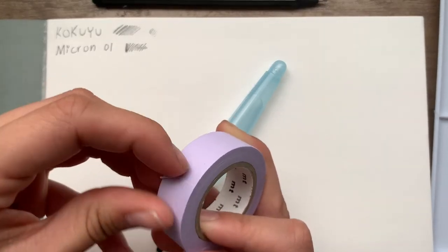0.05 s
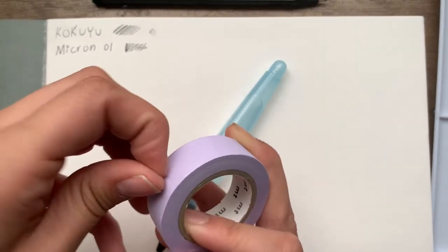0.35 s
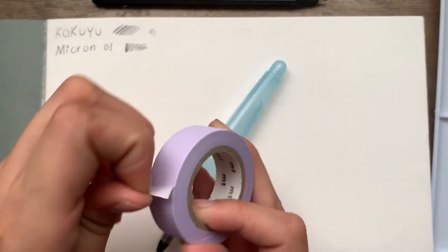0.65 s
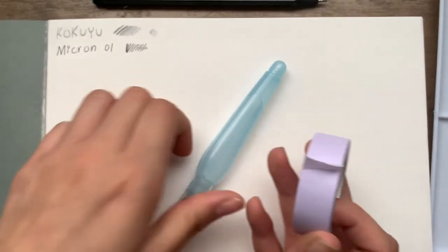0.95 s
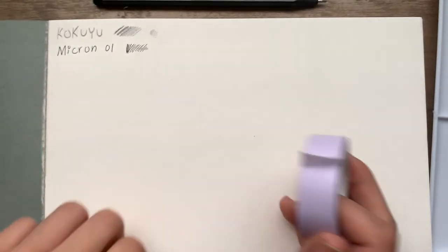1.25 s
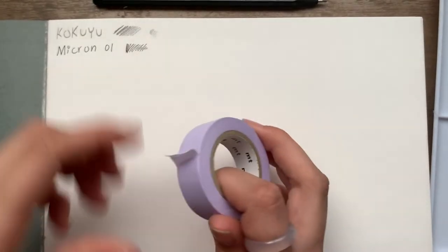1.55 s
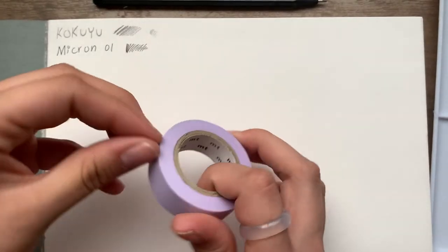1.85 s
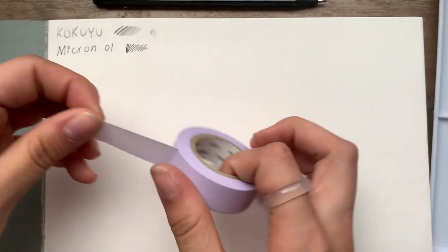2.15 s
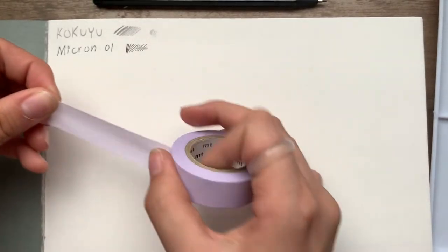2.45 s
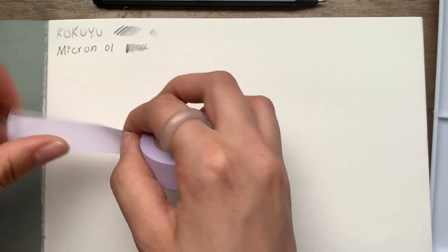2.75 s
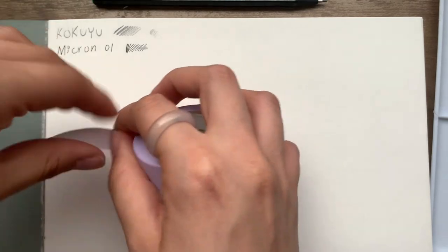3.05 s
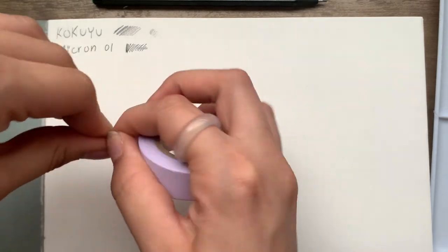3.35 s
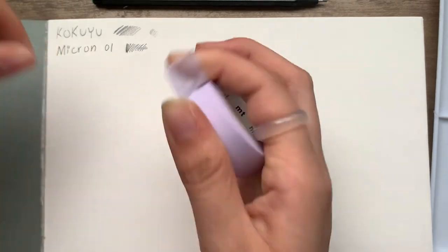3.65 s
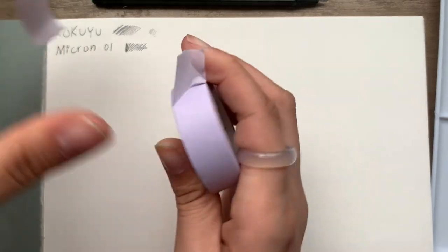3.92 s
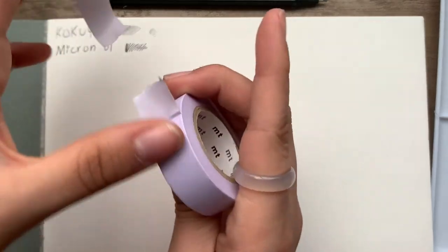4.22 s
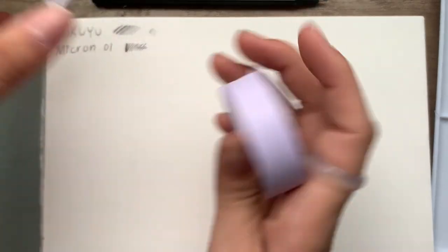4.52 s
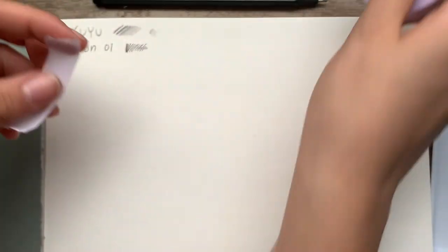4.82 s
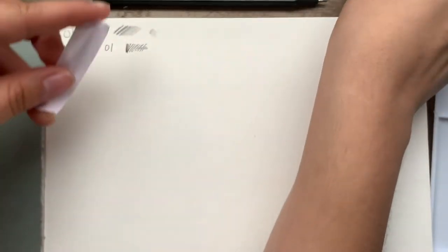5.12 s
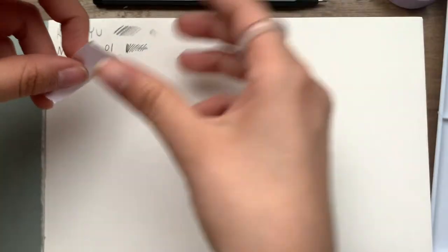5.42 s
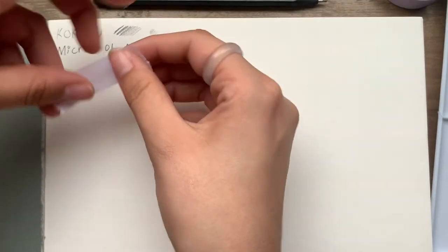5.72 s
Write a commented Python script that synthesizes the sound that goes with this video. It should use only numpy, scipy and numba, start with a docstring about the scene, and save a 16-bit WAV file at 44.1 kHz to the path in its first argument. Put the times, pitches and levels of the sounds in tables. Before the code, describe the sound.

Light nail clicks and a brief scrape lead into a plastic pen rattling down on a desk. Paper tape is then pulled from its roll with a soft, raspy hiss, crinkles slightly and is torn off with a crisp snap, with a second snap just after. The cardboard roll knocks hollowly onto the desk, and fingers faintly handle the strip. Everything is heard up close, indoors, over a faint low hum.

```python
"""Paper tape is peeled from its roll, close to a phone: glue threads rupture in a hiss and drive the taut
strip, which rasps and squeaks at a pitch that falls as it lengthens. Before the peel, a nail picks the end
loose and a plastic pen slides off paper, clatters onto the desk and rocks to rest. After it, the strip is
torn off and flicked free of a finger, and the roll is set down in hollow knocks. Impacts excite damped
modes, friction gives noise in tiny ruptures, and a small room hums quietly."""
import sys
import numpy as np
from scipy import signal
from scipy.fft import rfft, irfft, next_fast_len
from scipy.io import wavfile
from scipy.ndimage import uniform_filter1d, map_coordinates
from numba import njit

SR = 44100
rng = np.random.default_rng(int(sys.argv[2]) if len(sys.argv) > 2 else 0)


def store_wav(level_fs):
    """Save 16-bit WAV to argv[1]."""
    pcm = np.round(np.clip(np.atleast_2d(level_fs), -1, 1) * 32767)
    wavfile.write(sys.argv[1], SR, pcm.T.astype(np.int16))


N = 263762
TIME = np.arange(N) / SR
BRIEF = TIME[:SR // 2]  # time axis of one short event
TOP_HZ, PATCHY_DB = 16600, 3.5  # upper band edge; depth of the colour changes in rubbing and peeling


def amp(db):
    """Amplitude ratio of a level in decibels."""
    return 10 ** (np.asarray(db) / 20)

def unit(x):
    """Normalisation to rms 1."""
    return x / np.sqrt(np.mean(x ** 2) + 1e-20)

def crest(x):
    """Normalisation to peak 1."""
    return x / np.abs(x).max()

def along(points, hz):
    """Interpolation of (f/Hz, value) points on a logarithmic frequency axis."""
    f, v = np.transpose(points)
    return np.interp(np.log(hz + 1), np.log(f), v)

def add(track, s, sound):
    """Superposition of a short sound on a track at time s."""
    part = track[round(s * SR):][:len(sound)]
    part += sound[:len(part)]

def ease(middle, width):
    """Smooth step from 0 to 1 around a moment."""
    return .5 + .5 * np.tanh((TIME - middle) / (2 * width))

def drift(rate, size=N):
    """Random modulation: a smooth curve through rate knots a second."""
    knots = rng.standard_normal(4096)
    return map_coordinates(knots, [TIME[:size] * rate], order=2, mode="wrap")

def filtered(x, response):
    """Linear filtering: the spectrum of x times a frequency response."""
    n = x.shape[-1]
    m = next_fast_len(n + 8192)
    return irfft(rfft(x, m) * response(np.fft.rfftfreq(m, 1 / SR)), m)[..., :n]

def colour(x, spectrum, tilt_db=0):
    """Spectral shaping, tilted per octave and rolled off below the spectrum's first point."""
    low_cut = lambda hz: np.minimum(1, hz / spectrum[0][0]) ** 2
    octaves = lambda hz: np.log2(np.maximum(hz, 700) / 5000)
    return filtered(x, lambda hz: low_cut(hz) * amp(along(spectrum, hz) + tilt_db * octaves(hz)))

def soft(hz, top_hz):
    """Low-pass gain of a compliant contact, which excites little above top_hz."""
    return 1 / np.sqrt(1 + (hz / top_hz) ** 8)

def patchy(x, depth_db):
    """Random spectral modulation: the colour shifts from moment to moment."""
    spectra = signal.stft(x, nperseg=512)[2]
    field = uniform_filter1d(rng.standard_normal(spectra.shape), size=5, axis=0)
    field = uniform_filter1d(field, size=4, axis=1)
    return signal.istft(spectra * unit(amp(depth_db * unit(field))), nperseg=512)[1][:N]

def grains(rate, spread_db, size=N):
    """Shot noise: tiny random ruptures of uneven strength, rate a second."""
    happens = rng.random(size) < rate / SR
    impulses = happens * rng.standard_normal(size)
    return unit(impulses * amp(spread_db * np.clip(rng.standard_normal(size), -2, 2)))

def ring(modes, attack, vary_db, detune, top_hz=TOP_HZ):
    """Free vibration after a blow: damped modes, varied at random as the point of contact differs."""
    hz, db, t60 = np.transpose(modes)[:, :, None]
    strength, shift = rng.standard_normal((2, len(modes), 1))
    decay = amp(db + vary_db * strength - 60 * BRIEF / t60)
    waves = decay * np.sin(2 * np.pi * hz * (1 + detune * shift) * BRIEF)
    return crest((waves * soft(hz, top_hz)).sum(0) * (1 - np.exp(-BRIEF / attack)))

CRACK_MIDDLE_S = .02
def crack(lag=0):
    """Broadband transient: a millisecond of noise with a faint skirt, at CRACK_MIDDLE_S + lag."""
    t = BRIEF[:2048] - CRACK_MIDDLE_S - lag
    envelope = np.exp(-(t / .0007) ** 2) + amp(-20) * np.exp(-np.abs(t) / .003)
    return envelope * rng.standard_normal(len(t))

# width of the room's sound: f/Hz, side level relative to mid/dB
SIDE_SPECTRUM = [(60, -17), (300, -10), (800, -5), (1500, -3)]
def diffuse(mid, side):
    """Diffuse field: long waves reach both microphones alike, so the width grows towards the treble."""
    side = filtered(side, lambda hz: amp(along(SIDE_SPECTRUM, hz)))
    return np.array([mid + side, mid - side])

# spectrum of the room's noise: f/Hz, level/dB
FLOOR_SPECTRUM = [(45, 4.5), (70, -1.5), (105, -6.5), (160, -7), (280, -20), (420, -31), (800, -37.5),
                  (6000, -44.5), (15500, -44.5)]
# tones of the hum: f/Hz, level/dB
HUM_TONES = [(48.4, -76.5), (102.3, -66), (123.8, -68), (296.1, -82)]
def background():
    """Ambient noise: rumble, faint hiss and a mains hum wavering in amplitude and phase."""
    rumble = diffuse(*unit(colour(rng.standard_normal((2, N)), FLOOR_SPECTRUM)))
    hum = np.zeros(N)
    for hz, db in HUM_TONES:
        amplitude = np.sqrt(2) * amp(db + 2 * drift(rate=7))
        hum += amplitude * np.sin(2 * np.pi * hz * TIME + 2.1 * drift(rate=8.5))
    return amp(-63) * rumble + hum

# friction spectrum of skin: f/Hz, level/dB
SKIN_SPECTRUM = [(700, -21), (1800, -9), (3500, -5), (5000, -8), (7200, -5.5), (9000, -2), (15500, -3.5)]
# spells of shifting grip, each between two moments: t/s, t/s
GRIP_SHIFTS = [(.38, 0.72), (1.8, 1.9), (2.89, 3.07), (3.819, 3.7), (4.9, 5.26), (5.701, 10.4)]
def handling():
    """Light friction: skin rubs faintly and unevenly while the fingers shift their grip."""
    moving = sum(ease(start, width=.025) - ease(end, width=.025) for start, end in GRIP_SHIFTS)
    rub = unit(colour(grains(rate=3000, spread_db=4), SKIN_SPECTRUM, tilt_db=4))
    return moving * amp(-68.5 + 3.5 * drift(rate=11)) * rub

# fingertip strokes on tape or paper: middle t/s, level/dB, half duration/s, tilt/(dB per octave)
STROKES = [(0.603, -54, 0.045, 7), (1.108, -54, 0.083, -0.5), (3.643, -66, 0.16, 2),
           (3.93, -51.5, 0.077, 5.5), (4.313, -58.5, 0.043, 7.5), (4.603, -64, 0.042, -2),
           (4.728, -61, 0.054, -6), (4.796, -55, 0.06, 6), (5.04, -56.5, 0.07, -0.5),
           (5.582, -56, 0.037, 1.5), (5.774, -49, .034, 16.5)]
def fingers():
    """Stick-slip friction: skin ridges catch unevenly, with dry ticks, as a stroke swells and fades."""
    out, middle, size = np.zeros(N), BRIEF[-1] / 2, len(BRIEF)
    for s, db, half_length, tilt_db in STROKES:
        catches = grains(rate=3000, spread_db=3.5, size=size) * amp(3 * drift(rate=90, size=size))
        ticks = .6 * grains(rate=110, spread_db=2, size=size)
        swell = np.exp(-((BRIEF - middle) / half_length) ** 2)
        add(out, s - middle, amp(db) * swell * unit(colour(catches + ticks, SKIN_SPECTRUM, tilt_db)))
    return out

# spectrum of a nail's tick: f/Hz, level/dB
NAIL_SPECTRUM = [(1400, -11), (2400, -13.5), (4000, 1), (5200, -6), (9600, 0), (15500, -4)]
# clicks: t/s, tick level/dB, cutoff f/Hz, ring level/dB, ring f/Hz, ring T60/s
CLICKS = [(.718, -35, 12000, -53, 1120, .02), (.845, -29, 7000, -39, 900, .003),
          (1.4425, -29, 16000, -45, 1500, .005), (4.7055, -28, 16000, -39, 1100, .004)]
def nails():
    """Impulse excitation: a fingernail or a hard edge ticks and sets one mode ringing briefly."""
    out = np.zeros(N)
    for s, db, top_hz, ring_db, ring_hz, t60 in CLICKS:
        tick = filtered(colour(crack(), NAIL_SPECTRUM), lambda hz: soft(hz, top_hz))
        add(out, s - CRACK_MIDDLE_S, amp(db) * crest(tick))
        add(out, s, amp(ring_db) * ring([(ring_hz, 0, t60)], attack=.0001, vary_db=0, detune=0))
    return out

# spectrum of contact noise: f/Hz, level/dB
GRIT_SPECTRUM = [(700, -17), (1600, 8.5), (3200, -2), (5000, -5), (6500, -8.5), (10000, -18.5),
                 (15500, -19)]
def strikes(contacts, modes, attack, grit_db, grit_t60, detune):
    """Impact sound: each contact (t/s, level/dB, cutoff f/Hz) gives ringing modes and brief noise."""
    out = np.zeros(N)
    for s, db, top_hz in contacts:
        grit = unit(colour(rng.standard_normal(len(BRIEF)), GRIT_SPECTRUM))
        body = ring(modes, attack, vary_db=2, detune=detune, top_hz=top_hz)
        add(out, s, amp(db) * (body + grit * amp(grit_db - 60 * BRIEF / grit_t60)))
    return out

# modes of the pen's barrel: f/Hz, level/dB, T60/s
PEN_MODES = [(780, -18, .07), (950, -17, .06), (1560, 0, .014), (1873, -2, .013), (2250, -8, .009),
             (2950, 1, .009), (3700, -5, .008), (6400, -10, .007)]
# the pen hits the desk: t/s, clack level/dB, desk boom level/dB, cutoff f/Hz
PEN_CLACKS = [(0.973, -44.5, -43, 1700), (1.001, -48, -42, 1700), (1.052, -37.5, -49.5, 7000),
              (1.3508, -15.5, -27.5, 9000), (1.3981, -23, -35.5, 8000), (1.422, -28, -37, 1900),
              (1.44, -32.5, -19.5, 2200), (1.452, -24.5, -49, 6150), (1.486, -26.5, -23, 1900),
              (1.496, -20, -29.5, 2000), (1.524, -34, -24.5, 2376), (1.5376, -24, -39, 2200),
              (1.5484, -32.5, -31, 2300), (1.5613, -49, -28, 2400), (1.5954, -38.5, -33, 2010),
              (1.6244, -43.5, -35.5, 1980)]
def pen():
    """Modal ringing: the pen lands tip first, then on its side with duller clacks, and rocks to rest."""
    contacts = [(s, db, top_hz) for s, db, _, top_hz in PEN_CLACKS]
    return strikes(contacts, PEN_MODES, attack=.0003, grit_db=-15, grit_t60=.024, detune=.05)

# modes of the desk top: f/Hz, level/dB, T60/s
DESK_MODES = [(107, -29, .2), (187, -21, .14), (273, -20, .13), (310, 0, .02), (317, -22, .11),
              (500, -13, .05), (699, -20, .06), (796, -22, .06)]
# jolts of tearing and flicking, passed to the desk by the hand: t/s, level/dB
JOLTS = [(3.388, -60), (3.974, -52)]
def desk():
    """Plate vibration: the desk top gives and booms under the pen, the roll and the jolted hand."""
    pen_lag_s, roll_lag_s = .0048, .0036
    under_pen = [(s + pen_lag_s, db) for s, _, db, _ in PEN_CLACKS]
    under_roll = [(s + roll_lag_s, db) for s, _, db in ROLL_KNOCKS]
    out = np.zeros(N)
    for s, db in under_pen + under_roll + JOLTS:
        add(out, s, amp(db) * ring(DESK_MODES, attack=.0017, vary_db=1.5, detune=.008))
    return out

# spectrum of scraping: f/Hz, level/dB
DRAG_SPECTRUM = [(400, 2), (650, -13), (1100, -1.5), (1900, -1.5), (2500, -7), (3300, -9), (8000, -13),
                 (15500, -18.5)]
# pushes of the pen or roll: t/s, duration/s, level/dB, tilt/(dB per octave)
SLIDES = [(0.995, 0.057, -54, -1.5), (1.046, 0.17, -42, -1.5), (5.207, 0.045, -41.5, -1)]
def sliding():
    """Sliding friction: pen and roll scrape on paper and desk; a push starts sharply, sags and stops."""
    attack_s, sag_db_per_s, stop_db_per_s = .004, 75, 276
    onset = 1 - np.exp(-BRIEF / attack_s)
    out = np.zeros(N)
    for s, length, db, tilt_db in SLIDES:
        fall_db = sag_db_per_s * BRIEF + stop_db_per_s * np.maximum(BRIEF - length, 0)
        grit = unit(colour(grains(rate=2500, spread_db=1, size=len(BRIEF)), DRAG_SPECTRUM, tilt_db))
        add(out, s, onset * amp(db - fall_db) * grit)
    return out

# spectrum of parting paper fibres: f/Hz, level/dB
FIBRE_SPECTRUM = [(600, -41), (1200, -14.5), (2200, -10.5), (4000, -2), (7000, -7), (9000, 6), (11000, -1),
                  (13000, 9.5), (15500, -7)]
# the tape creases: t/s, level/dB, duration/s, tilt/(dB per octave)
CRINKLES = [(1.76, -54.5, 0.06, 6.5), (2.683, -50, 0.044, -5.5), (2.722, -47.5, 0.032, -7),
            (3.167, -55, 0.013, -1), (3.383, -41, 0.016, -1), (3.416, -48, 0.034, 0.5),
            (3.481, -44, 0.018, 0.5), (3.586, -46.5, 0.011, 1), (3.819, -49, 0.006, 0),
            (5.036, -33.5, 0.014, 2.5), (5.589, -56, 0.029, -8)]
def crinkles():
    """Acoustic emission: paper fibres crease and part in short runs."""
    out = np.zeros(N)
    for s, db, length, tilt_db in CRINKLES:
        envelope = (1 - np.exp(-BRIEF / .003)) * np.exp(-(BRIEF / length) ** 2)
        ruptures = grains(rate=5000, spread_db=4.5, size=len(BRIEF))
        add(out, s, amp(db) * envelope * unit(colour(ruptures, FIBRE_SPECTRUM, tilt_db)))
    return out

@njit
def resonate(x, turn, radius):
    """Two-pole resonance whose frequency moves; turn is in radians per sample."""
    y = np.zeros(len(x))
    for i in range(2, len(x)):
        y[i] = x[i] * np.sin(turn[i]) + 2 * radius * np.cos(turn[i]) * y[i - 1] - radius**2 * y[i - 2]
    return y

# the free strip as the hand draws away: t/s, length/m, squeak level/dB
STRIP = [(1.975, 0.017, -77), (2.012, 0.0197, -54), (2.035, 0.023, -56), (2.06, 0.027, -59),
         (2.085, 0.035, -55), (2.121, 0.041, -52), (2.145, .053, -59), (2.18, 0.056, -58),
         (2.215, 0.062, -72)]
def squeak(threads):
    """String resonance: snapping threads drive two modes, f = k c / 2L, falling as the strip lengthens."""
    wave_m_per_s, bandwidth_hz, overtone_db = 87, 340, -8
    s, length, level = np.transpose(STRIP)
    metres = np.interp(TIME, s, length)
    level_db = np.interp(TIME, s, level, left=-140, right=-140)
    waver = 1 + .035 * drift(rate=130)  # uneven tension
    turn = 2 * np.pi * wave_m_per_s / (2 * metres) * waver / SR
    radius = np.exp(-np.pi * bandwidth_hz / SR)
    mode = lambda k: unit(resonate(resonate(threads, k * turn, radius), k * turn, radius))
    return amp(level_db) * unit(mode(1) + amp(overtone_db) * mode(2))

# spectra of the glue's hiss and the taut paper's buzz: f/Hz, level/dB
GLUE_SPECTRUM = [(2000, -18), (3300, -9.5), (4500, -12), (6200, 0.5), (7300, -12), (8200, 12.5), (9400, 0),
                 (10800, 0), (13700, 4), (15500, -4.5)]
RASP_SPECTRUM = [(700, -15), (1120, 2), (1500, -3.5), (2150, -2), (3300, -12.5), (6000, -24)]
# strength of the pull: t/s, level/dB
PULL = [(1.88, -79.5), (1.91, -68), (2.018, -54), (2.094, -56), (2.16, -51.5), (2.236, -57), (2.36, -62.5),
        (2.404, -59), (2.48, -70)]
def peel():
    """Stick-slip peeling: glue threads snap in a dense hiss and shake the strip into rasp and squeak."""
    pull_db = np.interp(TIME, *np.transpose(PULL), left=-140, right=-140)
    threads = grains(rate=14000, spread_db=2) + .6 * grains(rate=400, spread_db=2)
    threads *= amp(1.3 * drift(rate=330))  # the glue sticks and slips
    hiss = amp(pull_db + 5) * unit(colour(threads, GLUE_SPECTRUM))
    taut = ease(middle=2.05, width=.011)
    rasp_db = -56.5 + 1.63 * (pull_db - pull_db.max())  # grows faster than the pull
    rasp = taut * amp(rasp_db) * unit(colour(threads, RASP_SPECTRUM))
    return squeak(threads) + patchy(hiss + rasp, PATCHY_DB)

# spectrum of a snap: f/Hz, level/dB
SNAP_SPECTRUM = [(700, -25.5), (1200, -21.5), (1900, -13), (3000, -9.5), (7500, -1.5), (11000, 7.5),
                 (13000, 1.5), (15500, 9)]
# modes of the slackened strip: f/Hz, level/dB, T60/s
POP_MODES = [(520, -7, .005), (1100, -1, .007), (1700, 1, .006)]
# the tape snaps: t/s, crack level/dB, tilt/(dB per octave), pop level/dB
SNAPS = [(2.495, -27, 2, -77), (2.615, -52.5, -12, -61), (2.75, -31.5, -8.5, -52), (3.5122, -9, -1.5, -54),
         (3.9721, -14.5, -3, -31), (5.2565, -28, -.5, -50), (5.6147, -35, -8, -73),
         (5.888, -39, -5.5, -55.5)]
def snaps():
    """Sudden release of strain: the tape slips a little, then lets go, and the slackened strip pops."""
    slip_lead_s, slip_db = .0045, -9
    out = np.zeros(N)
    for s, db, tilt_db, pop_db in SNAPS:
        burst = crack() + amp(slip_db) * crack(-slip_lead_s)
        add(out, s - CRACK_MIDDLE_S, amp(db) * crest(colour(burst, SNAP_SPECTRUM, tilt_db)))
        add(out, s, amp(pop_db) * ring(POP_MODES, attack=.0001, vary_db=1, detune=.04))
    return out

def tear():
    """Crack growth: the noise of parting fibres swells as the tear crosses the strip, then dies."""
    parted_s, grow_s, fade_s = 3.514, .016, .008
    envelope = np.exp(np.minimum((TIME - parted_s) / grow_s, (parted_s - TIME) / fade_s))
    ruptures = grains(rate=11000, spread_db=7)
    return amp(-42) * envelope * unit(colour(ruptures, FIBRE_SPECTRUM, tilt_db=2))

# narrow resonance of stiff paper: f/Hz, level/dB
PAPER_SPECTRUM = [(2500, -43.5), (3100, 0.5), (4000, -2), (4800, -22), (8000, -56)]
# the loose end flexes between the fingers: middle t/s, level/dB, half duration/s
RUSTLES = [(3.64, -68.5, 0.041), (3.725, -73.5, 0.022), (3.925, -68, 0.064)]
def rustles():
    """Resonant crackle: sparse little cracks ring in the stiff paper as the loose end flexes."""
    bending = sum(amp(db) * np.exp(-((TIME - s) / half_length) ** 2) for s, db, half_length in RUSTLES)
    return bending * unit(colour(grains(rate=900, spread_db=2), PAPER_SPECTRUM))

# modes of the roll: f/Hz, level/dB, T60/s
ROLL_MODES = [(520, -18, .06), (760, -3, .014), (836, -21, .08), (950, 0, .013), (965, -21, .08),
              (1370, -23, .05), (1750, -12, .014), (2200, -18, .01), (3300, -18, .009)]
# its cardboard core hits the desk: t/s, knock level/dB, desk boom level/dB
ROLL_KNOCKS = [(5.07, -58, -38), (5.182, -21, -28.5), (5.217, -27.5, -57), (5.232, -30.5, -53),
               (5.2768, -24.5, -25), (5.328, -15.5, -28)]
def roll():
    """Compliant impact: soft cardboard knocks hollowly, with little treble and one weak rebound each."""
    rebound_s, rebound_db = .017, -20
    contacts = [(s + k * rebound_s, db + k * rebound_db, TOP_HZ)
                for s, db, _ in ROLL_KNOCKS for k in range(2)]
    knocks = strikes(contacts, ROLL_MODES, attack=.0021, grit_db=-16, grit_t60=.035, detune=.03)
    return filtered(knocks, lambda hz: soft(hz, top_hz=7507))

# reverberation time of the small room: f/Hz, T60/s
ROOM_DECAY = [(100, 0.9), (260, 0.21), (700, 0.15), (2000, 0.23), (6000, 0.13), (15000, 0.1)]
def room(x):
    """Reverberation: a tail of decaying noise, drawn anew each quarter second as the hands move."""
    out, hop = np.zeros((2, N)), SR // 4
    for start in range(0, N, hop):
        hz, t, noise = signal.stft(rng.standard_normal((2, SR // 2)), SR, nperseg=256)
        decay = amp(-60 * t / along(ROOM_DECAY, hz)[:, None])
        onset = 1 - np.exp(-t / .0014)
        tails = signal.istft(noise * decay * onset, SR, nperseg=256)[1]
        for track, tail in zip(out, diffuse(*tails)):
            add(track, start / SR, signal.fftconvolve(x[start:start + hop], tail / np.linalg.norm(tail)))
    return out

def scene():
    """Superposition of direct and reverberant sound: tape close by, desk sounds a little farther off."""
    rubs = patchy(fingers() + handling() + sliding(), PATCHY_DB)
    tape = peel() + snaps() + nails() + crinkles() + rustles() + tear() + rubs
    bounce_db, bounce_s = -14, .00105  # reflection from the desk makes a comb filter
    tape = filtered(tape, lambda hz: 1 + amp(bounce_db) * np.exp(-2j * np.pi * hz * bounce_s))
    near = tape + amp(-18) * room(tape)
    clacks, knocks, booms = pen(), roll(), desk()
    echo = room(amp(-8.5) * clacks + amp(-8) * knocks + amp(-6.5) * booms)
    return near + clacks + knocks + booms + echo + background()

# phase between the phone's channels: f/Hz, lead of left over right/rad
PHASE_LEAD = [(0, 0), (330, -.6), (750, .2), (1100, -.5), (2500, 1.2), (3700, 1.7), (6400, 6),
              (15000, 18.8)]
def record(dry):
    """Band-limited stereo pickup: the left leads in the treble; the right is louder below 4400 Hz."""
    sides, fade_hz = np.array([[1], [-1]]), 900
    lead = lambda hz: np.exp(.5j * sides * np.interp(hz, *np.transpose(PHASE_LEAD)))
    balance = lambda hz: amp(.5 * sides * along([(400, -.7), (2200, -2), (4400, 0)], hz))
    low_cut = lambda hz: hz ** 6 / (hz ** 6 + 33 ** 6)
    high_cut = lambda hz: np.sin(np.pi / 2 * np.clip((TOP_HZ - hz) / fade_hz, 0, 1)) ** 2
    return filtered(dry, lambda hz: lead(hz) * balance(hz) * low_cut(hz) * high_cut(hz))


dry = scene()
out = record(dry)
store_wav(out)
```